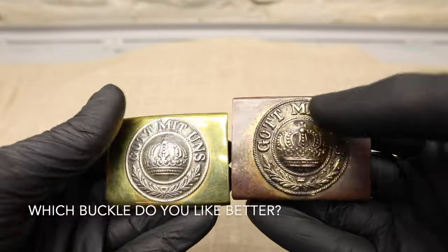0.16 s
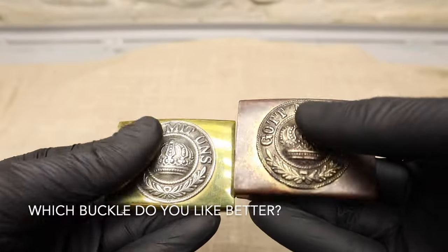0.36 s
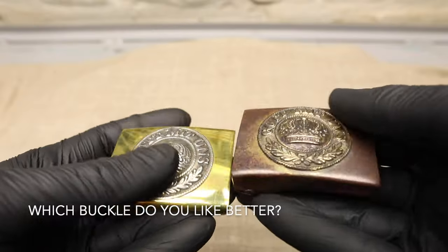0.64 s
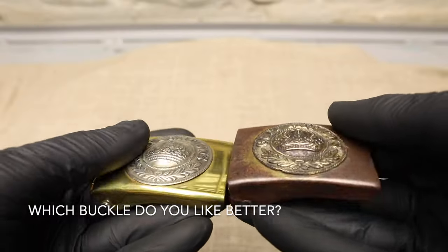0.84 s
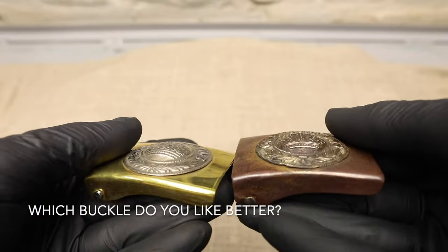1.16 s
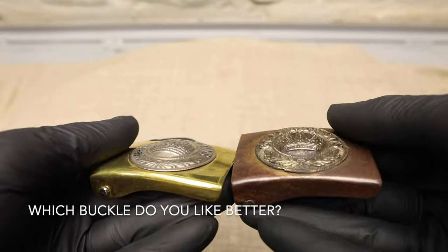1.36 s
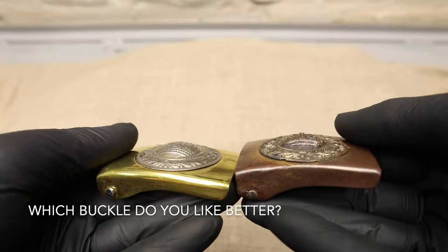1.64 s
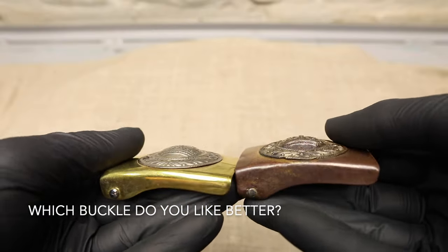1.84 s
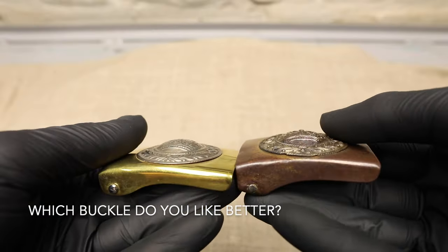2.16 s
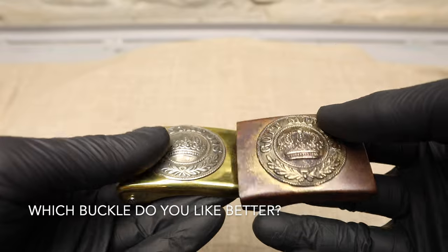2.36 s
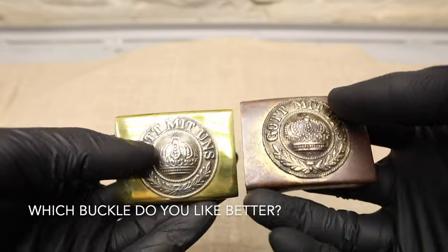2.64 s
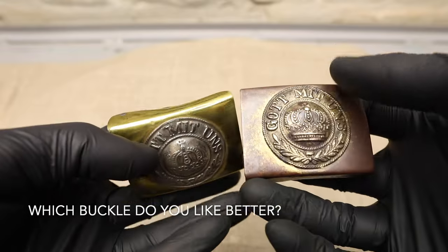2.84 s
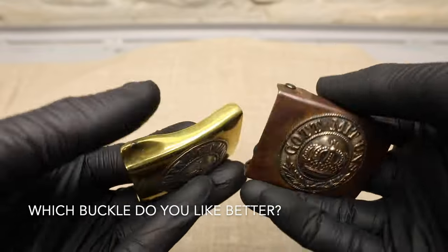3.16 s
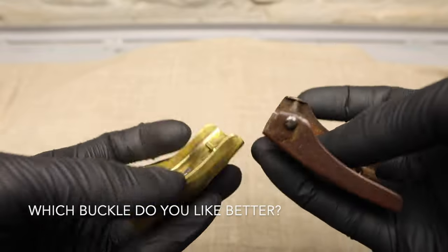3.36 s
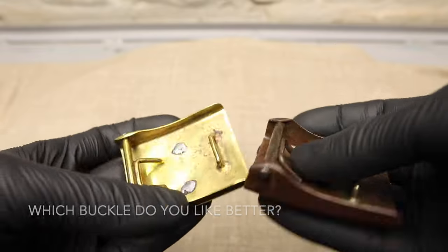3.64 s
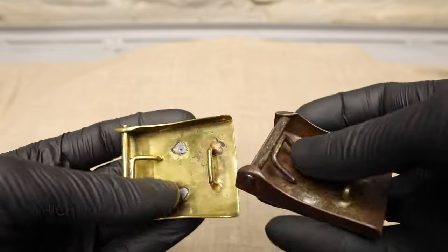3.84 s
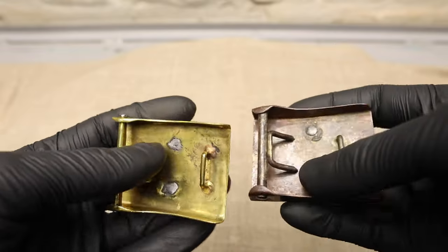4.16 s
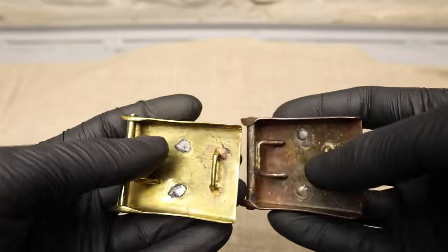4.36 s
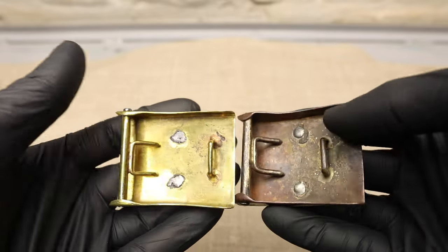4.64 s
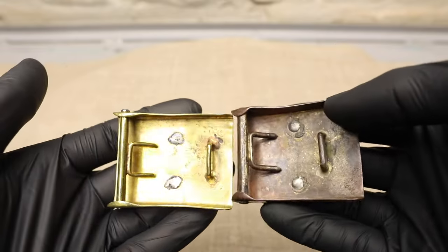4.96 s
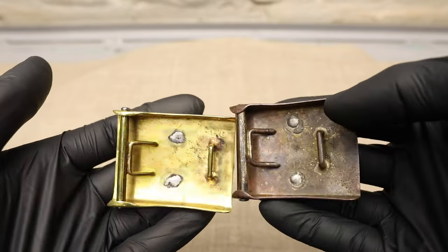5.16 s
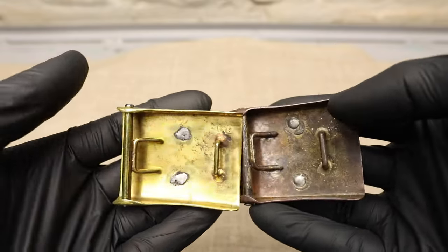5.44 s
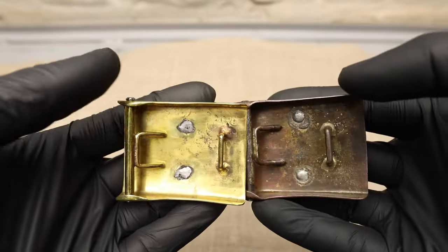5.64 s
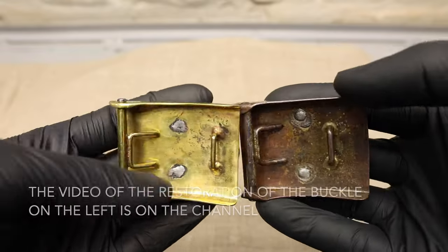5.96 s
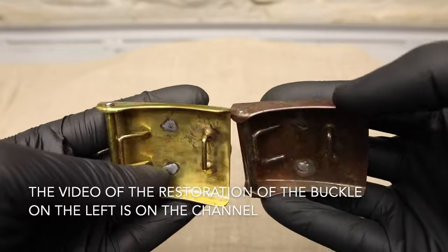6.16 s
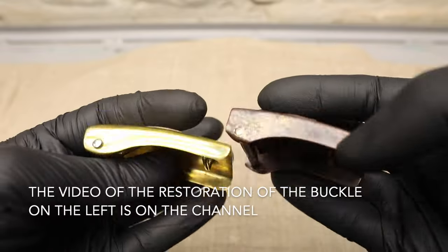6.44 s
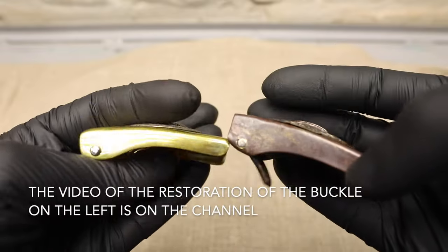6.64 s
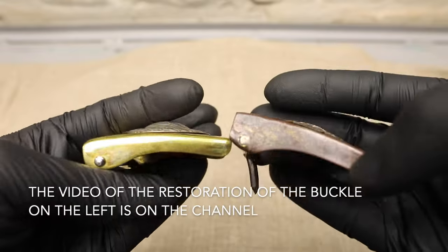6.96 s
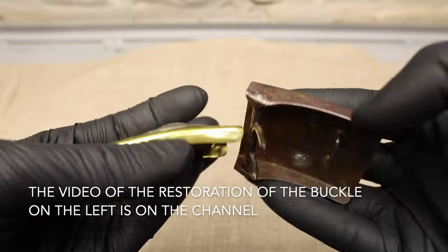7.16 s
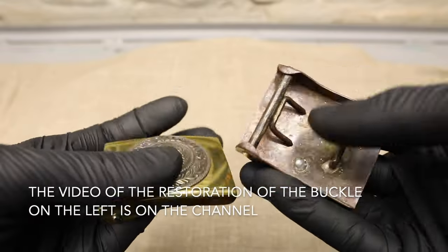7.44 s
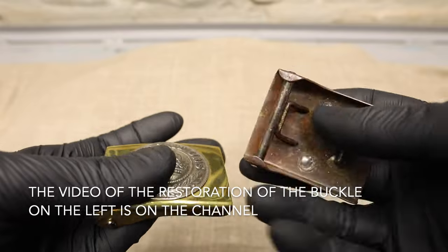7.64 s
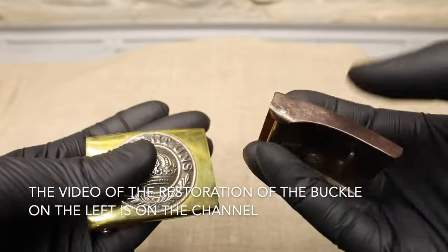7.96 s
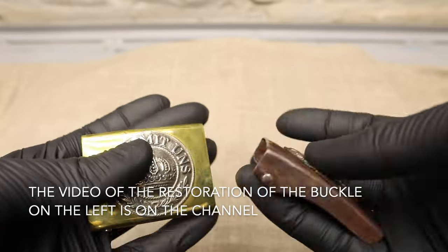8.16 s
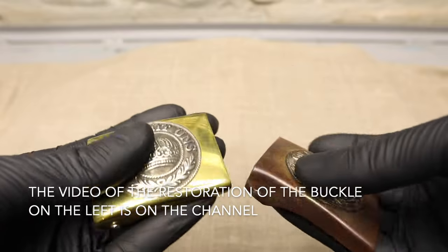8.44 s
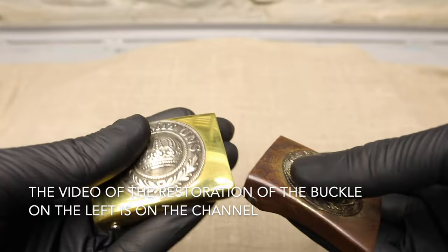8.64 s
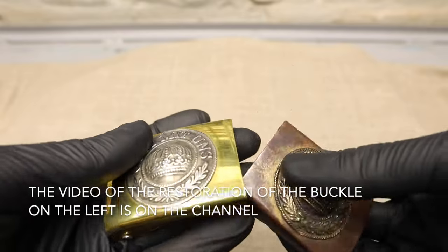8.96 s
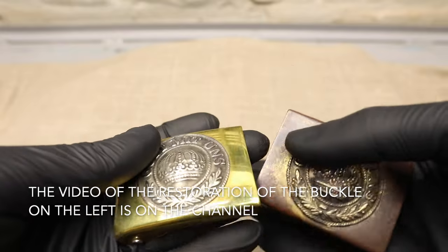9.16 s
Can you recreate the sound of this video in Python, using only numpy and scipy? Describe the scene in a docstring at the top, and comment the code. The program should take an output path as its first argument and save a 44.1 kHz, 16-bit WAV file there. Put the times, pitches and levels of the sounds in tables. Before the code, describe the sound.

Two small sheet-metal buckles are handled in rubber gloves close to the microphone in a small, quiet room. A low fan rumble, soft hiss and faint wavering drone run throughout. Faint ticks and isolated light clinks open, at about 0.3 and 0.8 seconds. From 1.5 to 2.8 clinks gather with short gritty scrapes, with stronger bright hits near 2.4. Gloves rub around 3.1, then a tight flurry clicks at 3.4, with sharp clinks at 3.7 and 3.9. Small rubber ticks fill the gap until 4.7. From 4.8 to 6.2 irregular clinks and light scrapes continue, followed by single clicks at 6.3 and 6.6. After a lull, the hardest burst rattles and scrapes at 7.3 to 7.5, with a dull hand bump. From 7.9 rubber rubs, squeaks and ticks lead, with a weak clink at 8.5 and a final crisp one at 9.2.

```python
"""Gloved hands turn two small sheet-metal belt buckles close to a camera, over fan hum, hiss and a wavering drone.
Clinks start sparse, gather with scrapes from 1.5 s to 2.8 s, and come in flurries near 3.4 s and from 4.8 s;
the hardest burst falls at 7.3 s. Rubber rubs and ticks between them and leads from 7.9 s; last clinks near 9.2 s.
Contacts ring damped modes, scrapes drive the same modes with gritty noise, and gloves are patchy filtered noise
with short tones. A small room answers with decaying noise."""
import sys
import numpy as np
from scipy import signal
from scipy.fft import rfft, irfft, next_fast_len
from scipy.io import wavfile
from scipy.ndimage import map_coordinates

SR = 44100
rng = np.random.default_rng(int(sys.argv[2]) if len(sys.argv) > 2 else 0)


def generate_wav(sig):
    """Save sig (samples, or channels by samples) to the path in sys.argv[1] as 16-bit PCM at SR."""
    pcm = np.round(np.clip(np.atleast_2d(sig).T, -1, 1) * 32767).astype(np.int16)
    wavfile.write(sys.argv[1], SR, pcm)


N = 409688

PLATE_HZ = 1700  # the whole plate flexing
# modes of the buckles: (frequency [Hz], relative level [dB], t60 when free [s])
BUCKLE_MODES = [(1464, -7.5, .12), (PLATE_HZ, 2.5, 0.26), (1724, -4.5, 0.11), (2030, -2, 0.26),
                (2280, -4.5, 0.068), (2600, -15.5, 0.07), (2730, -3, 0.15), (2996, -6, 0.12),
                (3090, -1, 0.19), (3300, -24, .1), (3554, -2.5, 0.083), (4110, -11, 0.39), (4440, 4, 0.092),
                (4372, 1, 0.16), (4740, -3.5, 0.25), (4900, -9, 0.32), (5010, -8.5, 0.19),
                (5640, -36, 0.0995), (5400, -12, 0.34), (6200, -2, .25), (6490, -16.5, 0.04),
                (6850, -6.5, 0.16), (7500, -2.5, 0.084), (7350, -10, 0.33), (7820, -0.5, 0.16),
                (9050, -5, 0.14), (10800, -28, .04), (12070, 6.5, 0.094)]


def amp(db):
    """dB to gain."""
    return 10 ** (np.asarray(db) / 20)


def unit(x):
    """Scaled to rms 1."""
    return x / np.sqrt(np.mean(x ** 2) + 1e-20)


def along(points, hz):
    """(Hz, value) points interpolated on a log frequency axis."""
    f, value = np.transpose(points)
    return np.interp(np.log(hz + 1), np.log(f + 1), value)


def curves(rows):
    """One value per sample for each column after the time."""
    time_s, *columns = np.transpose(rows)
    return [np.interp(np.arange(N) / SR, time_s, column) for column in columns]


def wobble(knots_per_s):
    """A smooth random curve through normally distributed knots."""
    knots = rng.standard_normal(int(N * knots_per_s / SR) + 4)
    return map_coordinates(knots, [np.arange(N) * knots_per_s / SR])


def filtered(x, response):
    """x times a complex response of frequency."""
    size = next_fast_len(x.shape[-1] + 8192)
    spectrum = rfft(x, size) * response(np.fft.rfftfreq(size, 1 / SR))
    return irfft(spectrum, size)[..., :x.shape[-1]]


def grit(spiky_db):
    """Slips of friction: noise whose sample levels in dB are exponentially spread."""
    size_db = spiky_db * np.minimum(rng.exponential(size=N), 6)
    return unit(rng.standard_normal(N) * amp(size_db))


def add(track, time_s, sound):
    """Mixes a sound in at a time."""
    part = track[round(time_s * SR):][:len(sound)]
    part += sound[:len(part)]


def swell(crest_s, db, rise_s, fall_s):
    """A gain that climbs 20 dB to its crest in rise_s and sinks 20 dB in fall_s."""
    shape = 2.3  # 1 pointed, 2 rounded
    t = np.arange(N) / SR - crest_s
    return amp(db - 20 * np.abs(t / np.where(t < 0, rise_s, fall_s)) ** shape)


def bump(db, hz):
    """A low push: a sine that dies within a few cycles."""
    t = np.arange(SR // 20) / SR
    return amp(db) * np.sin(2 * np.pi * hz * t) * np.exp(-hz * t / 0.71)


def clinks():
    """Each contact chatters and rings plate modes, strongest near the frequencies of the spot struck."""
    # metal contacts: (time [s], level [dB], then against the 2.2-3.9 kHz modes: plate flexing [dB],
    # middle modes [dB], brightness [dB]; favoured low, middle and high mode [Hz, Hz, Hz],
    # freedom to ring [0-1], t60 of the plate flexing before 0.01 s is added [s])
    contacts = [(0.3388, -37, -17, -19, -21, 2100, 4806, 6380, 0.28, 0.16),
                (0.3727, -40, -16, -5, -9, 2820, 4640, 7900, 0.22, 0.15),
                (0.7724, -33, -9, 1, -4.5, 2820, 4769, 9200, 0.21, 0.13),
                (1.492, -31.5, -8, -7, -21, 2880, 4360, 7300, 0.42, 0.13),
                (1.541, -32.5, -3, -7, -15, 3090, 4763, 7830, 0.44, 0.1),
                (1.6093, -43.5, -9, -6, -14, 3090, 4900, 6860, 0.32, 0.14),
                (1.8504, -29, -13.5, -10, -19, 3359, 4000, 7810, 0.39, 0.14),
                (2.2952, -30, -13, -13, -12, 2560, 4770, 7830, 0.5, 0.16),
                (2.3101, -20, -9.5, -8, -18, 2730, 4400, 6800, 0.49, 0.26),
                (2.356, -14, -11.5, -6, -15.5, 2852, 4083, 7400, 0.25, 0.16),
                (2.4334, -32, -23, -11, -25, 3080, 5020, 6400, 0.1, 0.16),
                (2.4779, -13, -6, -1, -6, 2770, 3930, 7560, 0.2, 0.11),
                (2.6827, -41, -14, 2, -25, 3000, 4030, 7460, 0.12, 0.16),
                (2.7818, -33, -25, -8, -6, 2800, 4750, 7460, 0.2, 0.16),
                (3.3011, -36, -7.5, 1, 1.5, 2960, 5713, 6560, 0.23, 0.12),
                (3.3884, -20.5, -10.5, 4, -5, 3100, 4670, 6400, 0.06, 0.12),
                (3.398, -21, -26, 0, 6.5, 3090, 4398, 6260, 0.32, 0.16),
                (3.4057, -17.5, -29, -6, 3, 2860, 5087, 7430, 0.26, 0.16),
                (3.419, -22, -24, 2.5, 7.5, 2740, 4740, 7500, 0.14, 0.16),
                (3.6407, -30, -17, -10, -38, 2796, 4360, 7490, 0.19, 0.15),
                (3.7018, -15.5, -18, 1.5, -1, 2740, 5200, 7900, 0.11, 0.092),
                (3.8612, -16.5, -4.5, 5.5, -4, 2520, 4740, 8000, 0.17, 0.22),
                (4.7512, -22.5, -18.5, -8.5, -16.5, 2880, 4280, 7900, 0.33, 0.18),
                (4.8059, -31.5, -15, -5, -19, 3770, 4510, 6350, 0.48, 0.16),
                (4.98, -39.5, -9, -7, -27, 2690, 4009, 6420, 0.63, 0.16),
                (5.0432, -43, -3, -14, -20, 2700, 4860, 6730, 0.34, 0.16),
                (5.2073, -37.5, -13, -5.5, -27, 3877, 4220, 6460, 0.16, 0.16),
                (5.291, -24, -21, -0.5, -8, 3590, 4890, 7440, 0.22, 0.16),
                (5.4061, -24, -16.5, -2, -17, 2820, 4065, 6840, 0.4, 0.16),
                (5.4115, -18.5, -20, 0.5, -12, 3315, 4280, 7800, 0.22, 0.16),
                (5.476, -32.5, -14, 0, -24, 3121, 4040, 6490, 0.15, 0.16),
                (5.7052, -30.5, -23, -16, -17, 3550, 4968, 6730, 0.07, 0.17),
                (5.7261, -21, -15, 0.5, -10, 3060, 4570, 7820, 0.23, 0.2),
                (5.7623, -38.5, -10.5, -11, -25, 3300, 4410, 6890, 0.6, 0.16),
                (5.852, -18, -22, -4.5, -8, 3120, 4520, 7570, 0.37, 0.19),
                (6.0399, -39, -20, 1, -4, 3060, 4871, 7750, 0.4, 0.16),
                (6.1275, -38, -14, -3, -8, 3160, 4828, 7860, 0.56, 0.16),
                (6.1529, -33.5, -15, -4, -7, 3230, 6050, 7800, 0.4, 0.16),
                (6.3407, -19.5, -32, -6.5, -3, 3180, 5030, 6900, 0.37, 0.16),
                (6.6198, -18, -11, -6.5, -8.5, 2990, 5270, 8060, 0.35, 0.12),
                (7.2755, -19, -11, -4, -4, 2810, 4200, 7820, 0.06, 0.16),
                (7.2819, -13.5, -20, -7, -1.5, 2850, 4970, 7820, 0.24, 0.16),
                (7.2974, -24, -20, -3, 0.5, 2700, 5030, 7820, 0.56, 0.16),
                (7.3076, -20.5, -9, -2, -5, 3200, 5030, 7800, 0.4, 0.18),
                (7.3163, -22, -7, -2.5, -3, 3560, 4600, 8760, 0.6, 0.18),
                (7.3279, -18.5, -10.5, -3, -9, 3812, 5010, 6490, 0.28, 0.16),
                (7.3381, -11.5, -17, -3, -8, 2700, 4910, 9000, 0.2, 0.13),
                (7.3874, -31, -7, 2.5, 0, 3200, 5010, 9000, 0.4, 0.16),
                (7.424, -16.5, -30, -5.5, 4, 2750, 4700, 8200, 0.18, 0.16),
                (7.4386, -30.5, -7, 0, -8, 3070, 4795, 7350, 0.22, 0.15),
                (7.453, -24.5, -26, -11, 3, 2940, 4710, 8690, 0.32, 0.16),
                (7.4634, -33, -30, -1, -2, 3060, 3900, 7870, 0.28, 0.16),
                (7.6103, -27.5, -28, -4.5, -22, 4100, 4740, 8710, 0.05, 0.16),
                (7.67, -30, -22, 4, 6, 3170, 4740, 7860, 0.31, 0.16),
                (8.472, -34, -16, -4, 3.5, 3260, 4050, 8250, 0.28, 0.13),
                (9.1715, -35, -22, 3, 1, 2860, 4806, 7600, 0.12, 0.15),
                (9.199, -19.5, -32, -3.5, -0.5, 2900, 4750, 7600, 0.23, 0.16)]
    # edges of the five colour bands: (frequency [Hz])
    edges_hz = [1300, 2200, 3900, 6300, 9500, 16800]
    low_db, top_db, top_grows = -7.5, -8, 1.15  # all bands; top band = top_grows * brightness + top_db
    detune = .003  # relative pitch scatter of a mode from grip to grip
    spot_rings = 1.4  # favoured modes ring this much longer
    knock_hz, knock_db, knock_grows = 727, -9, 1.73  # dull knock in the hand; hard contacts knock more

    out, knocks = np.zeros(N), np.zeros(N)
    t = np.arange(SR // 6) / SR
    short_t = t[:SR // 25]
    hz, mode_db, t60_s = np.array(BUCKLE_MODES).T[..., None]
    band = np.searchsorted(edges_hz, hz[:, 0]) - 1
    mids_hz = np.sqrt(np.multiply(edges_hz[1:], edges_hz[:-1]))

    def favour_db(f, width, tops_hz):
        return sum(11 * np.exp(-(np.log(f / top) / width) ** 2) for top in tops_hz)

    for time_s, db, plate_db, mid_db, bright_db, *spot_hz, free, plate_t60_s in contacts:
        top_band_db = top_grows * bright_db + top_db
        colour_db = low_db + np.array([plate_db, 0, mid_db, bright_db, top_band_db])
        free = np.clip(free, .05, 1.5)
        tops_hz = (PLATE_HZ, *spot_hz)
        luck = rng.standard_normal((len(BUCKLE_MODES), 2))
        small, chatter = rng.random((60, 2)), rng.random((2, 2))

        favour = favour_db(hz, .03, tops_hz)
        held_t60_s = t60_s * free * spot_rings ** (favour / 11)
        life_s = np.where(hz == hz[1], abs(plate_t60_s) + .01, held_t60_s)  # row 1 is the plate flexing
        weight = amp(mode_db[:, 0] + favour[:, 0] + 2.5 * luck[:, 0])
        band_norm = np.sqrt(np.bincount(band, weight ** 2))[band]
        strength = weight / band_norm * amp(colour_db)[band]
        tones = np.sin(2 * np.pi * hz * (1 + detune * luck[:, 1:]) * t)
        ring = strength @ (np.exp(-np.log(1000) * t / life_s) * tones)

        # prongs, rivets and rims add many small modes that die quickly
        small_hz = 1600 + 15000 * small[:, :1] ** 1.6
        small_db = along([*zip(mids_hz, colour_db), (16600, colour_db[-1])], small_hz[:, 0])
        small_db += .5 * favour_db(small_hz[:, 0], .1, tops_hz) - 14 * small[:, 1]
        small_decay = amp(-60 * short_t / (0.014 + 0.049 * free))
        small_tones = np.sin(2 * np.pi * small_hz * short_t)
        ring[:len(short_t)] += amp(small_db - 1.5) @ (small_decay * small_tones)
        ring *= 1 - np.exp(-t / .0002)  # soft onset

        blow = amp(db) * ring
        add(out, time_s, blow)
        add(knocks, time_s, bump(knock_grows * db + knock_db, knock_hz))
        for late, weak in chatter:
            add(out, time_s + .001 + .004 * late, amp(-5 - 10 * weak) * blow)
    # keeps the low thump of abrupt tone starts out of the clinks
    highpass = signal.butter(6, 1480, "high", fs=SR, output="sos")
    return knocks + signal.sosfilt(highpass, out)


def scrapes():
    """Edges dragged over each other: gritty slips drive the buckle modes, widened by the grip."""
    # drags: (crest [s], level [dB], rise [s], fall [s])
    drags = [(1.496, -41.5, 0.0087, 0.018), (2.304, -44.5, 0.043, 0.0082), (2.402, -40, 0.034, 0.013),
             (4.835, -55, .01, .055), (4.94, -51.5, 0.064, .075), (5.195, -53, 0.017, .08),
             (5.39, -49.5, 0.074, 0.019), (5.504, -43, .05, 0.038), (5.65, -47.5, 0.04, .028),
             (6.043, -47, 0.045, 0.024), (6.154, -46, 0.062, 0.016), (6.212, -49.5, 0.033, 0.013),
             (7.3, -29.5, 0.029, 0.038), (7.4, -37, 0.037, 0.034)]
    level = sum(swell(*row) for row in drags)
    slips = grit(spiky_db=3.5) * amp(4.6 * wobble(120))

    def voice(f):
        modes = 0
        for k, (mode_hz, db, t60_s) in enumerate(BUCKLE_MODES):
            resonance = 1j * f * (11.0 / t60_s) / (mode_hz ** 2 - f * f + 1j * f * 8.1 / t60_s)
            modes = modes + (-1) ** k * amp(db) * resonance
        direct = 0.04 * (f > 1300)  # a share of the grit is heard as it is
        return (modes + direct) / (1 + (f / 7500) ** 5)  # a slow drag hardly reaches the highest modes

    dragged, steady = filtered(np.array([slips * level, slips]), voice)
    return dragged / np.std(steady)


def gloves():
    """Rubber hisses in patches as it slides, loudest around a moving squeak band, and ticks as it lets go."""
    # faint rub and rustle between and just after clinks: (time [s], level [dB])
    rustle = [(0, -67), (.7, -59.5), (1.09, -72), (1.4, -68), (2.12, -82.5), (2.32, -57), (2.78, -60.5),
              (3.03, -70), (3.26, -57.5), (3.9, -55.5), (4.4, -66), (4.79, -56.5), (5.1, -71), (5.4, -63.5),
              (6.2, -64), (6.8, -71), (7.45, -53.5), (8.25, -63.5), (9.29, -58)]
    # gloves sliding: (crest [s], level [dB], rise [s], fall [s], treble against it [dB], squeak band [Hz])
    strokes = [(.86, -63, .05, 0.022, 0, 3700), (1.04, -63, 0.11, 0.072, -12, 2210),
               (1.42, -74.5, 0.068, 0.13, 1, 4300), (3.04, -59, .025, 0.067, 3.5, 4000),
               (3.118, -53.5, 0.044, 0.032, -16, 2800), (3.196, -57, .035, 0.04, -25, 3210),
               (3.503, -56.5, 0.0082, 0.047, 4, 4580), (4.634, -55, 0.14, 0.038, -29, 4460),
               (4.683, -56, 0.026, 0.012, 5.5, 4500), (7.05, -65.5, 0.037, 0.068, 2, 3600),
               (7.885, -54.5, .03, 0.055, -5.5, 2150), (7.996, -49.5, .06, 0.065, -14, 4200),
               (8.153, -47, 0.029, 0.078, -11, 2660), (8.646, -56, 0.032, 0.024, -1, 5000),
               (8.736, -63, .03, 0.034, -11, 2880), (8.922, -47.5, 0.057, 0.029, -1, 4800),
               (9.064, -50.5, 0.022, 0.027, 1.5, 3160)]
    # rub spectrum, body: (frequency [Hz], relative level per Hz [dB])
    body_colour = [(600, -9), (1300, -11.5), (2000, -5.5), (5000, -12), (9000, -14), (15500, -24.5)]
    # rub spectrum, treble: (frequency [Hz], relative level per Hz [dB])
    fizz_colour = [(4000, -26), (7000, 0.5), (10000, -4.5), (15500, -13.5)]
    # rubber letting go of metal: (time [s], level before a 2 dB lift [dB], frequency [Hz])
    ticks = [(0.2572, -37, 2300), (0.49, -38.5, 2040), (0.7048, -41, 2500), (.9118, -35, 4760),
             (1.011, -36, 3430), (1.066, -33.5, 1920), (1.7078, -39, 3060), (2.6088, -30.5, 4720),
             (3.4554, -49, 4450), (3.4944, -38, 4430), (3.9985, -34, 4620), (4.0586, -35, 6100),
             (4.1084, -36.5, 2000), (4.1774, -34.5, 5040), (4.2414, -39.5, 2930), (4.3195, -41, 5460),
             (4.529, -35, 4670), (4.553, -32, 4740), (4.682, -33.5, 5570), (6.005, -33.5, 3180),
             (7.7682, -41, 5270), (8.1513, -29.5, 2500), (8.2102, -28.5, 8500), (8.3931, -34.5, 4820),
             (8.961, -37, 5240), (9.029, -38, 2260)]
    # dull bumps of a hand: (time [s], level [dB], frequency [Hz])
    bumps = [(1.063, -36, 920), (3.397, -39.5, 308), (7.339, -27.5, 410), (8.191, -36.5, 94.5)]
    stroked_hz, stroked_width_hz, stroked_db = 4620, 75, 5.1  # the mode that sliding fingers keep awake
    faint_count, faint_over_db, faint_mid_hz = 24, 19, 3200  # random ticks, set against the rustle level

    rustle_db, = curves(rustle)
    level, treble = amp(rustle_db), amp(rustle_db - 10.5)
    squeak_hz = np.full(N, 4650.)
    for *crest, treble_db, hz in strokes:
        stroke = swell(*crest)
        squeak_hz = (level * squeak_hz + stroke * hz) / (level + stroke)
        level = level + stroke
        treble = treble + amp(treble_db) * stroke

    hz, t, spectrum = signal.stft(grit(spiky_db=3.5) * amp(2.6 * wobble(70)), SR, nperseg=512)
    frame_hz = np.interp(t, np.arange(N) / SR, squeak_hz)
    squeak_db = 7 * np.exp(-(np.log((hz[:, None] + 1) / frame_hz) / 0.26) ** 2)
    metal_db = stroked_db / (1 + ((hz - stroked_hz) / stroked_width_hz) ** 2)
    body_gain = amp((along(body_colour, hz) + metal_db)[:, None] + squeak_db)
    body = unit(signal.istft(spectrum * body_gain, SR, nperseg=512)[1][:N])
    patches = grit(spiky_db=4.5) * amp(7.8 * wobble(35))
    fizz = unit(filtered(patches, lambda f: amp(along(fizz_colour, f))))
    out = level * body + treble * fizz

    faint = []
    for when, weak, pitch in rng.random((faint_count, 3)):
        db = rustle_db[int(when * N)] + faint_over_db - 8 * weak
        faint.append((when * N / SR, db, faint_mid_hz * 3 ** (pitch - .5)))
    t = np.arange(SR // 20) / SR
    for time_s, db, hz in [*ticks, *faint]:
        envelope = np.exp(-hz * t / 1.36) * (1 - np.exp(-hz * t / 0.079))
        add(out, time_s, amp(db + 2) * np.sin(2 * np.pi * hz * t) * envelope)
    for time_s, db, hz in bumps:
        add(out, time_s, bump(db, hz))
    return out


def room(x):
    """Wall echoes build up, then decay; the hands move, so their pattern is new every third of a second."""
    # reverberation: (frequency [Hz], t60 [s])
    decay = [(1000, 0.31), (3000, 0.49), (6000, 0.34), (12000, 0.22)]
    out, step = np.zeros(N), SR // 3
    for start in range(0, N, step):
        hz, t, spectrum = signal.stft(rng.standard_normal(SR // 2), SR, nperseg=256)
        onset = 1 - np.exp(-(t / 0.013) ** 2)
        fade = amp(-60 * t / along(decay, hz)[:, None])
        tail = signal.istft(spectrum * onset * fade, SR, nperseg=256)[1]
        echo = signal.fftconvolve(x[start:start + step], tail / np.linalg.norm(tail))
        add(out, start / SR, echo)
    return out


def air():
    """Fan rumble and hiss, shaped noise almost alike in both channels, with narrow wavering hums."""
    # noise spectrum: (frequency [Hz], relative level per Hz [dB])
    mid_colour = [(12, -51), (20, -26.5), (49, 0), (70, -2.5), (88, -8), (228, -5.5), (399, -10),
                  (660, -11), (718, -11), (802, -11.5), (1060, -13.5), (1610, -25.5), (1760, -19.5),
                  (2320, -26.5), (16000, -29.5)]
    # stereo width: (frequency [Hz], side against mid [dB])
    side_colour = [(30, -17.5), (500, -19), (1500, -26), (6000, -21), (12000, -6)]
    # a distant drone: (time [s], frequency [Hz], level [dB])
    drone_track = [(0, 226.4, -70), (2.9, 234.6, -63), (3.7, 233, -81), (4.5, 198.3, -65),
                   (5.5, 197.4, -61), (6.0, 181, -64), (6.5, 187.2, -60), (7.84, 194, -59),
                   (7.92, 198.2, -67), (9.29, 196, -67.5)]
    noise_db, hiss_top_hz = -58, 15800
    fan_hz, fan_db = 700, -66

    def colour(f):
        mid_gain = amp(along(mid_colour, f)) * (f < hiss_top_hz)
        return mid_gain * np.array([f ** 0, amp(along(side_colour, f))])

    mid, side = filtered(rng.standard_normal((2, N)), colour)
    gain = amp(noise_db + 0.25 * wobble(1.97)) / np.std(mid)
    fan_level = amp(fan_db + 1.8 * wobble(5))
    hum = fan_level * np.sin(2 * np.pi * np.cumsum(fan_hz + 1.455 * wobble(3)) / SR)
    drone_hz, drone_db = curves(drone_track)
    drone_level = amp(drone_db + 3 * wobble(14))
    drone = drone_level * np.sin(2 * np.pi * np.cumsum(drone_hz + 9 * wobble(20)) / SR)
    return gain * np.array([mid + side, mid - side]) + hum + drone


def scene():
    """Everything the hands do reaches both channels alike, with the room and the air around it."""
    hands = clinks() + scrapes() + gloves()
    return hands + amp(-18.5) * room(hands) + air()


def record(dry):
    """The camera keeps nothing above its 16.8 kHz band limit."""
    return filtered(dry, lambda hz: hz < 16800)


dry = scene()
out = record(dry)
generate_wav(out)
```